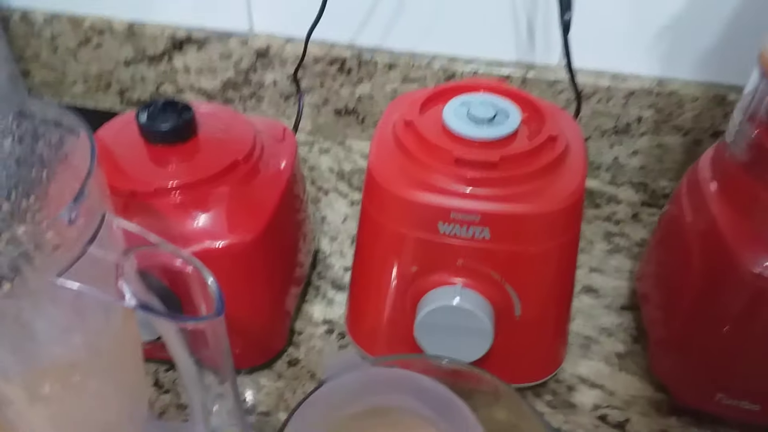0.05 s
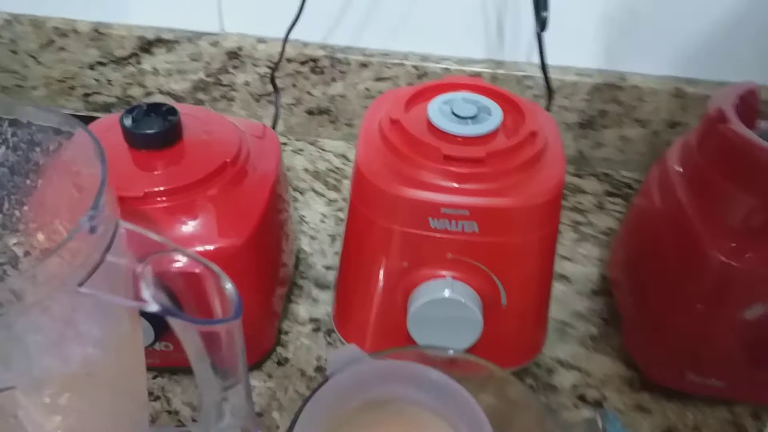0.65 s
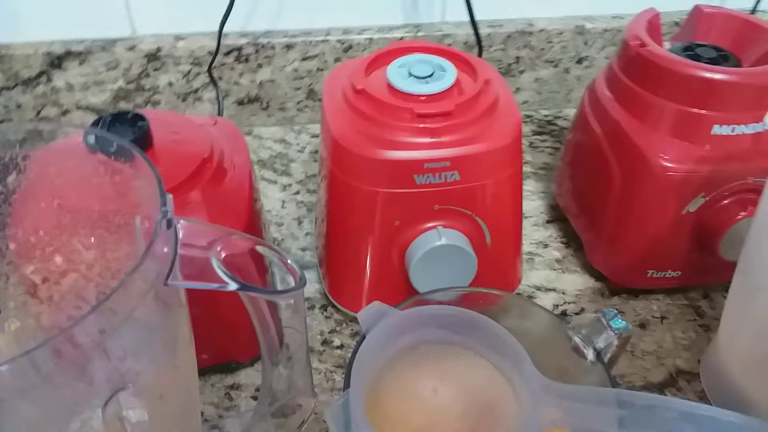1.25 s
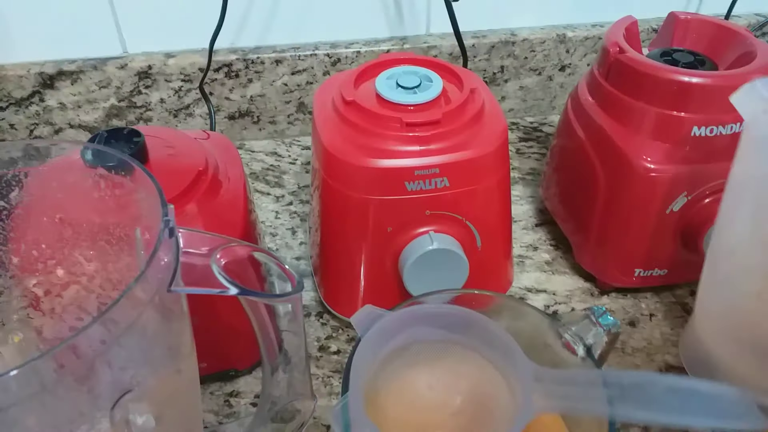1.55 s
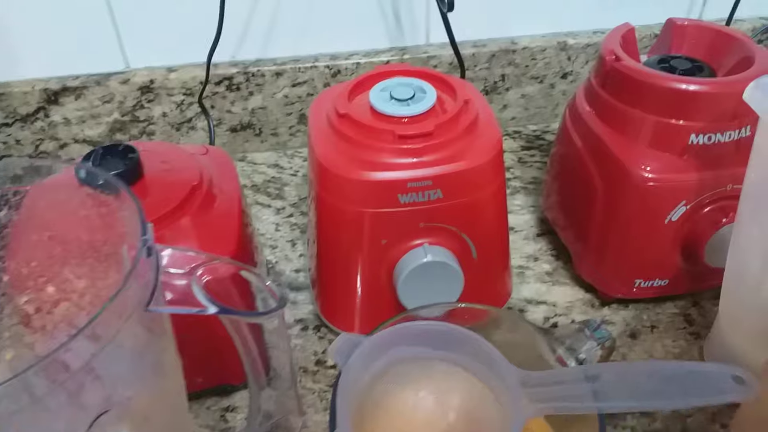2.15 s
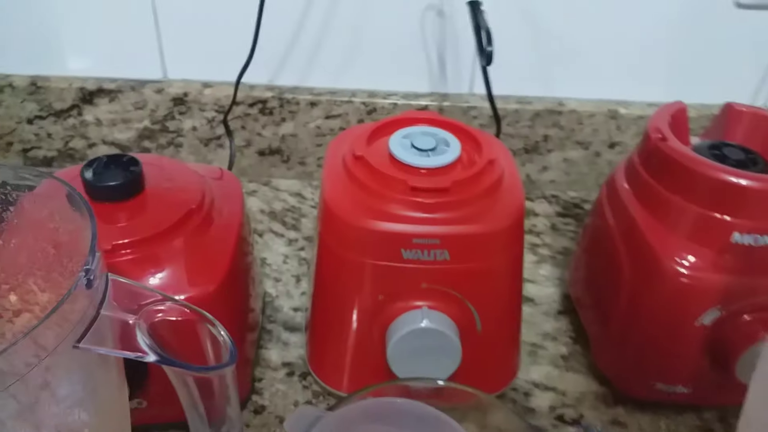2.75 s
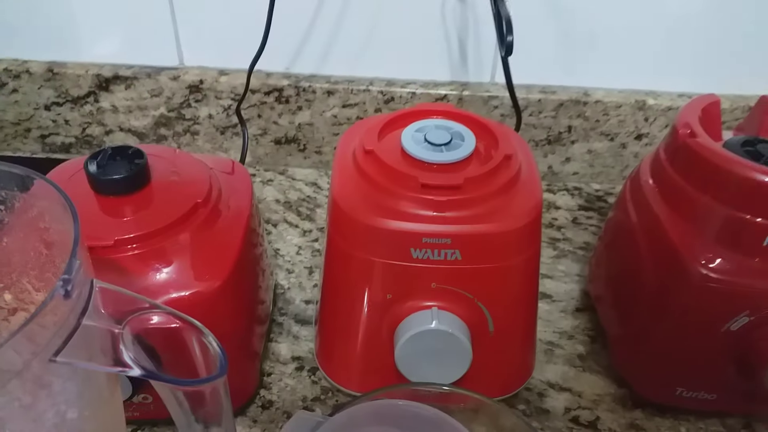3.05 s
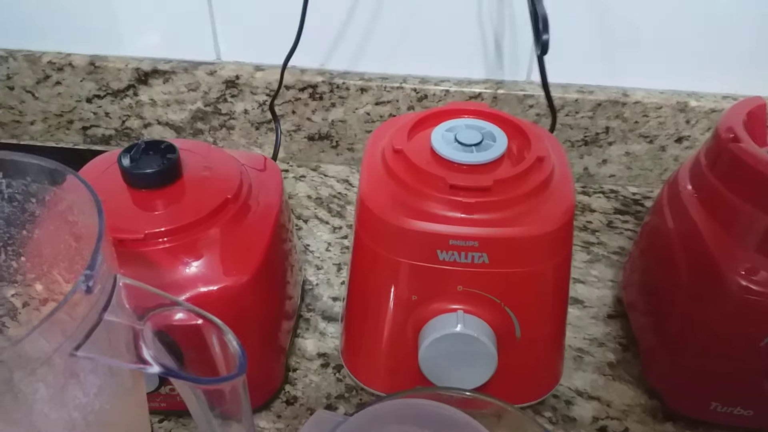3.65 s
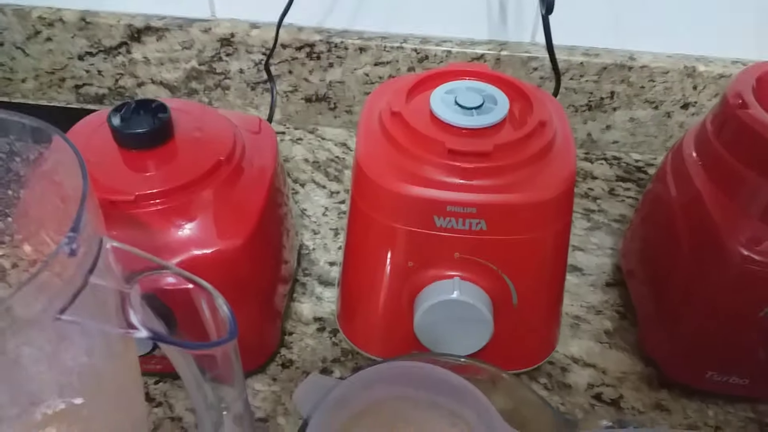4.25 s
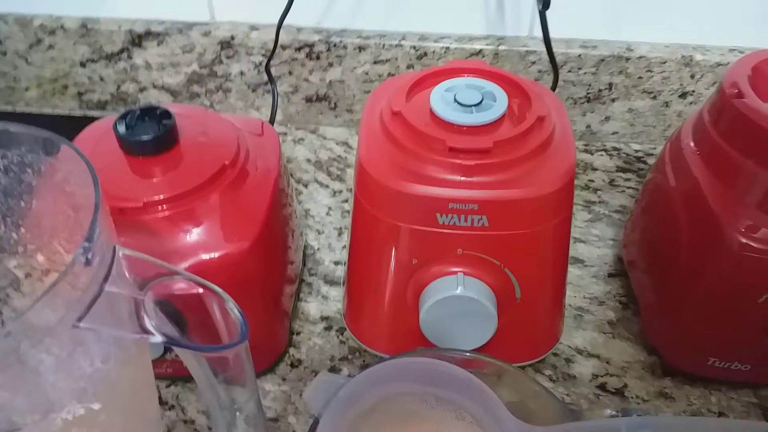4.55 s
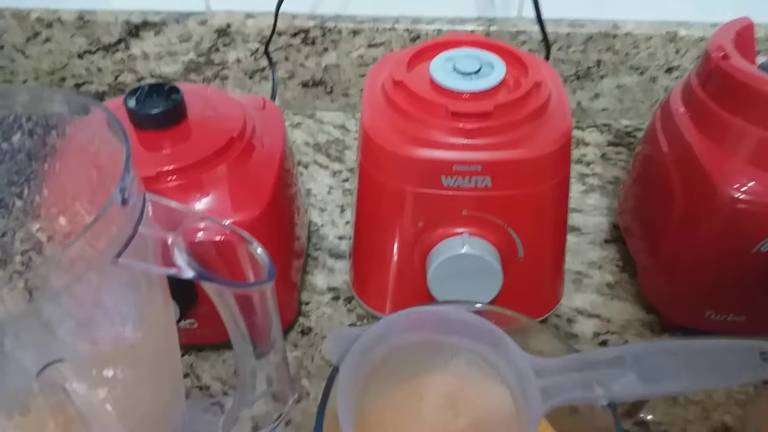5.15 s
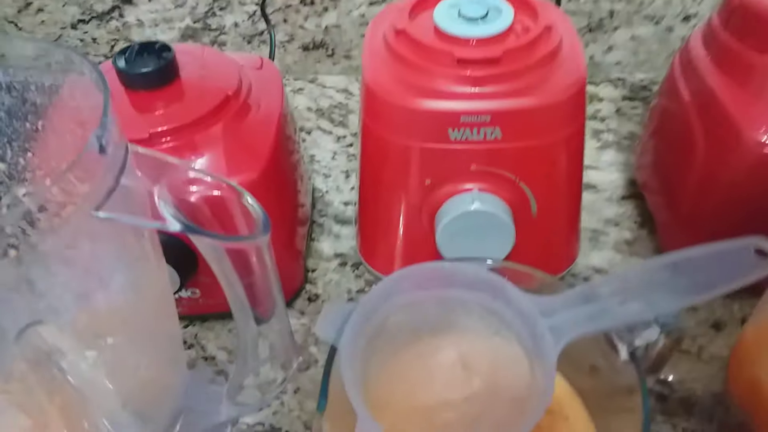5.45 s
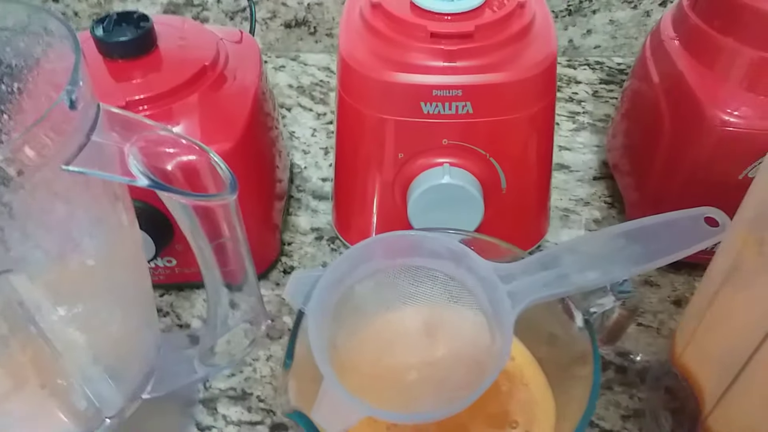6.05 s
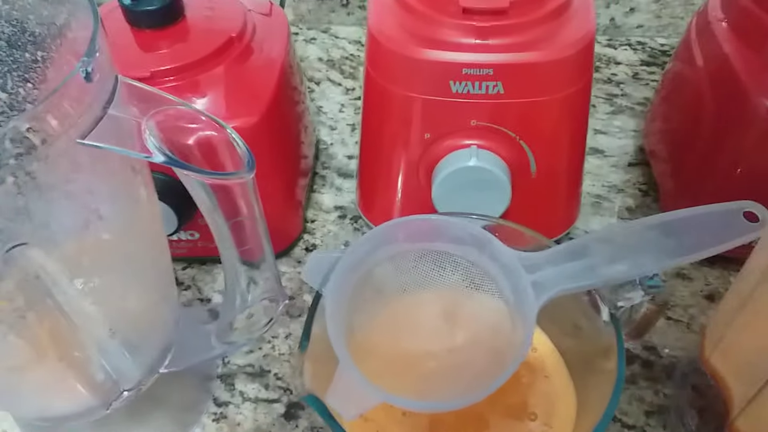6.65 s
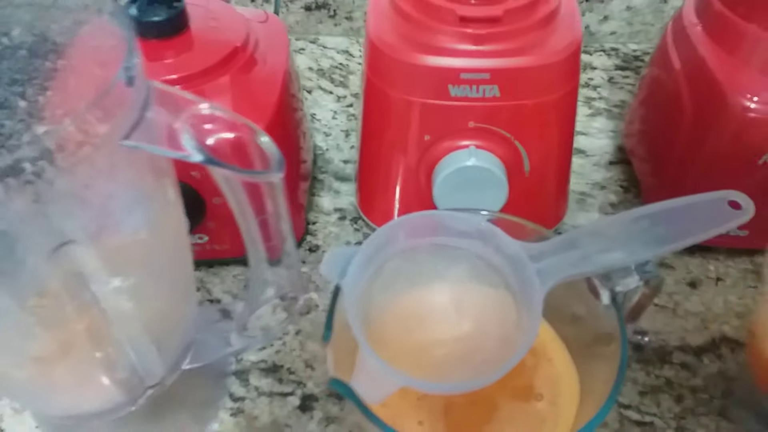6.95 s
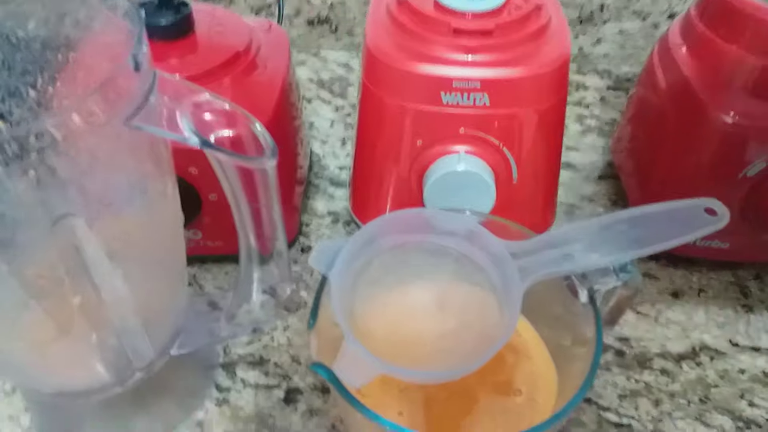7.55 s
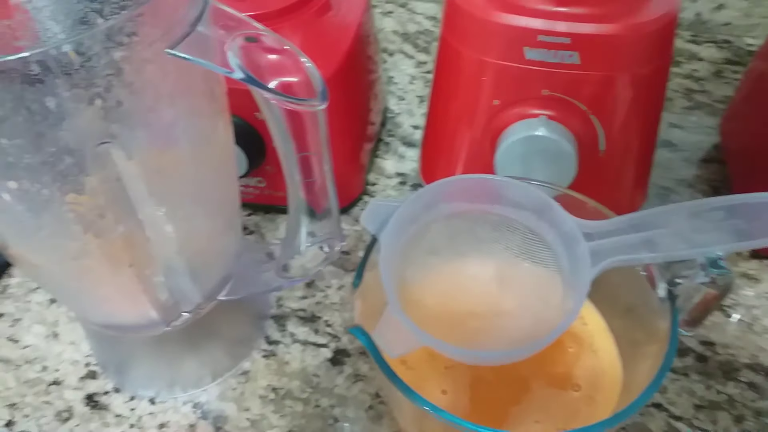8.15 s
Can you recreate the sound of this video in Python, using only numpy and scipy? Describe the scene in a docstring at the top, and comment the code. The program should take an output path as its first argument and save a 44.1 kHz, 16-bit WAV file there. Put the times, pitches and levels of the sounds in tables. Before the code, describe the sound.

Hollow plastic blender jugs are bumped, scraped and set down on stone, with two loud clatters and faint background hiss.

```python
"""Blender jugs on a stone counter.

Plastic jugs are lifted, bumped and set down in a small tiled kitchen. Each contact is a sharp click
plus the ring of the part hit; a jug set down bounces. Between blows, plastic slides and rubs.
Behind: a hush, swells of hiss, faint arching whistles. Gain control ducks after the hardest blows."""
import sys
import numpy as np
from scipy import signal
from scipy.fft import rfft, irfft
from scipy.io import wavfile
from scipy.ndimage import uniform_filter1d, minimum_filter1d

SR = 44100
rng = np.random.default_rng(int(sys.argv[2]) if len(sys.argv) > 2 else 0)


def materialize(psi):
    """Save the field psi as 16-bit PCM at rate SR to the path in sys.argv[1].

    A 1-D psi becomes a single channel; in a 2-D psi each row is a channel.
    """
    bounded = np.clip(np.atleast_2d(psi).T, -1, 1)
    quanta = np.round(bounded * 32767).astype(np.int16)
    wavfile.write(sys.argv[1], SR, quanta)


N = 370881
TIME_S = np.arange(N) / SR

# spectra of hush and hiss (frequency [Hz], relative density [dB])
HUSH_SPECTRUM = [(18, -54), (30, -15), (48, -9), (108, 4.5), (145, -5), (234, -3.5), (345, 1), (433, -5.5),
                 (485, -2), (1660, -11.5), (4050, -13), (5090, -14), (7000, -29), (9000, -26.5),
                 (16000, -20)]
HISS_SPECTRUM = [(2000, -26.5), (4200, -13.5), (5000, 1.5), (6000, -3.5), (7200, 5), (9000, -1.5),
                 (16000, -0.5)]
# hush envelope (time [s], level [dB])
HUSH_LEVEL = [(0, -49.5), (.45, -55), (2.6, -51), (3.7, -51.5), (4.3, -55), (6.9, -51.5), (7.55, -58),
              (7.97, -51.5), (8.41, -53)]
# swells of whistle and hiss (start [s], end [s], top pitch [Hz], whistle [dB], hiss [dB])
SWELLS = [(-.5, 0.545, 9000, -60, -44), (1.13, 1.896, 7900, -70, -57.5), (1.9, 3.1, 10000, -74, -48.5),
          (3.39, 4.099, 7100, -60.5, -63), (4.29, 4.911, 8400, -58.5, -54), (4.92, 5.55, 9000, -66, -53),
          (5.59, 6.324, 7400, -63, -58.5), (6.4, 7.206, 10000, -61, -46), (7.62, 8.32, 7900, -67.5, -60.5)]
# sliding strokes (start [s], end [s], scratch [dB], drone [dB])
SLIDES = [(0, 0.194, -56, -61), (1.975, 2.1, -36.5, -37), (2.09, 2.404, -54, -51.5),
          (2.453, 2.604, -45.5, -45), (2.6, 3.07, -52.5, -44.5), (3.14, 3.302, -37.5, -45),
          (3.85, 3.898, -53, -52.5), (4.85, 5.04, -51, -48.5), (5.183, 5.41, -60.5, -52.5),
          (6.607, 6.81, -50.5, -49), (6.843, 6.928, -35.5, -46.5)]
# resonances of a rubbed jug (centre [Hz], width [Hz], level [dB])
DRONE_BANDS = [(390, 200, 4), (1010, 99, 3), (1580, 160, -6.5), (2830, 83, -20)]
# blows, by part hit (time [s], ring [dB], pitch [ratio], click [dB])
BASE_BUMPS = [(.103, -31, 0.61, -36), (.1645, -23.5, 1.01, -22), (.197, -23, 1.58, -19),
              (1.621, -20, 1.12, -15), (1.8405, -9.5, .99, -10), (1.8935, -19.5, 1.2, -32),
              (2.051, -18.5, 1.25, -28), (2.080, -18.5, 0.97, -18.5), (2.1005, -12, 0.93, -15),
              (2.119, -23, 1.3, -17), (2.886, -28.5, 1, -39), (4.93, -32, 1.22, -40),
              (5.55, -37, 0.87, -33), (6.269, -18.5, 1.48, -11.5), (6.692, -28.5, 1.22, -29)]
HOLLOW_KNOCKS = [(1.364, -22, 0.92, -11.5), (1.391, -16.5, 0.97, -34), (1.4665, -13.5, 1.025, -19),
                 (2.568, -9, .99, -13.5), (2.582, -8.5, 1.035, -10.5), (2.7185, -30.5, 0.96, -17),
                 (2.7595, -20, 0.97, -16.5), (2.829, -22.5, .84, -16.5), (3.026, -31.5, 0.96, -62),
                 (4.292, -28, 0.88, -53)]
WALL_CLACKS = [(1.8415, -20.5, 0.86, -14), (3.1445, -20, 0.99, -8.5), (3.198, -31, 0.91, -42),
               (3.254, -27.5, 0.99, -29), (6.317, -17, 0.92, -6)]
FOOT_LANDING = [(3.9365, 3, 0.99, -0.5), (3.963, 0.5, 0.99, 6.5), (3.9995, 0, 0.98, 1)]
RIM_CLATTER = [(6.4145, -4, 0.98, 7), (6.4286, -3.5, 1, -5.5), (6.908, -39.5, 1, -33)]
# modes of each part (frequency [Hz], level [dB], T60 [s])
BASE_MODES = [(111.5, -14.5, .39), (209.3, -12, .42), (245, -11, .19), (291.8, -.5, .09), (325.8, -7, .12),
              (384, -2, .1), (481, -10, .18), (559, -7, .16), (813, -11, .1), (895, -13, .06),
              (1550, -21, .06)]
HOLLOW_MODES = [(116, -19.5, 0.27), (174.4, -18.5, 0.21), (308, -16, 0.059), (370.6, 2, 0.028),
                (475.7, -1.5, 0.31), (504, -16, 0.23), (507, -13.5, 0.11), (694, -29, 0.34),
                (899, -21.5, 0.27)]
WALL_MODES = [(113, -23.5, .17), (352, -17.5, .18), (486, -9, .2), (604, -11.5, .16), (803, -14, .4),
              (870, -1, .3), (961, -1, .3), (1025, -12.5, .4), (1850, -19, .18)]
FOOT_MODES = [(205, -17, .33), (345, -12, .27), (427, -5, .3), (459, -2, .33), (478, -8, .3),
              (560, -11, .25), (770, -11, .26), (860, -16, .2), (1017, -17, .18), (1284, -22, .22),
              (2122, -20, .2), (2220, -20, .2), (3068, -29, .15), (4250, -25, .1), (4550, -26, .1)]
RIM_MODES = [(340, -21.5, 0.41), (486, -16.5, 0.51), (538, -7, 0.23), (563, -3, 0.14), (1520, -15.5, 0.41),
             (1590, -14.5, 0.21), (2700, -22, 0.13), (2760, -6.5, 0.17), (3690, -11, 0.1),
             (3730, -6.5, .15), (4100, -10, .18), (4780, -19, .22), (5800, -20, .15)]
# light contacts (time [s], click [dB], brightness [Hz])
TICKS = [(1.402, -20, 6030), (1.4445, -22.5, 6000), (1.496, -21.5, 6000), (1.9875, -16, 9350),
         (4.482, -30.5, 3000), (4.709, -29, 14000), (5.1845, -14.5, 3550), (5.212, -22.5, 4000),
         (5.321, -36, 16100), (5.354, -31, 15800)]
# room decay (frequency [Hz], T60 [s])
KITCHEN_T60 = [(100, 0.58), (500, 0.33), (2000, 0.32), (5000, .32), (16000, 0.24)]


def from_db(db):
    """Decibels to gain."""
    return 10 ** (np.asarray(db) / 20)


def unit_rms(x):
    """Scale to rms 1."""
    return x / np.sqrt(np.mean(x ** 2) + 1e-20)


def at_hz(points, hz):
    """Interpolate a table over log frequency."""
    known_hz, values = np.transpose(points)
    return np.interp(np.log(np.maximum(hz, 1)), np.log(known_hz), values)


def butter(x, hz, kind, order=2):
    """Butterworth filter."""
    sos = signal.butter(order, np.clip(hz, 10, .45 * SR), kind, fs=SR, output="sos")
    return signal.sosfilt(sos, x)


def add(track, at_s, sound):
    """Mix a sound into a track."""
    start = max(round(at_s * SR), 0)
    track[start:start + len(sound)] += sound[:N - start]


def coloured_noise(spectrum):
    """Steady shaped noise, rms 1."""
    gain = from_db(at_hz(spectrum, np.fft.rfftfreq(N, 1 / SR)))
    return unit_rms(irfft(rfft(rng.standard_normal(N)) * gain, N))


def slow_noise(hz):
    """Low-passed noise, rms 1."""
    return unit_rms(butter(rng.standard_normal(N), hz, "low"))


def arch(start_s, end_s):
    """Parabola: 0 to 1 to 0."""
    along = np.clip((TIME_S - start_s) / (end_s - start_s), 0, 1)
    return 4 * along * (1 - along)


def kitchen(x, build_s=.0016):
    """Dense reflections off tiles: fast build-up, one decay rate per octave."""
    t = TIME_S[:SR * 3 // 5]
    noise, hz = rfft(rng.standard_normal(len(t))), np.fft.rfftfreq(len(t), 1 / SR)
    edges_hz = np.geomspace(45, 23040, 10)
    tail = np.zeros(len(t))
    for low, high in zip(edges_hz, edges_hz[1:]):
        band = irfft(noise * (hz >= low) * (hz < high), len(t))
        tail += band * from_db(-60 * t / at_hz(KITCHEN_T60, np.sqrt(low * high)))
    tail *= 1 - np.exp(-t / build_s)
    return signal.fftconvolve(x, tail / np.linalg.norm(tail))[:N]


def hush():
    """Room noise, drifting slowly in level."""
    return from_db(np.interp(TIME_S, *np.transpose(HUSH_LEVEL))) * coloured_noise(HUSH_SPECTRUM)


def hiss(rest_db=-63, full_at=.93, power=3.2):
    """Treble noise that grows with each swell, levels off and sinks."""
    swells = sum(from_db(db) * np.minimum(arch(start_s, end_s) / full_at, 1) ** power
                 for start_s, end_s, *_, db in SWELLS)
    return (from_db(rest_db) + swells) * coloured_noise(HISS_SPECTRUM)


def whistles(foot_hz=4700, width_hz=50, lower_ratio=.87, waver=.014, waver_hz=10, breakup_db=2.5):
    """Two thin whistles and their octaves arch with each swell, wavering and breaking up."""
    out, rise_hz, level, height = np.zeros((4, N))
    for start_s, end_s, top_hz, db, _ in SWELLS:
        swell = arch(start_s, end_s)
        rise_hz += (top_hz - foot_hz) * swell
        level += from_db(db) * swell ** .2
        height += swell
    pitch_hz = (foot_hz + rise_hz) * (1 + waver * height * slow_noise(waver_hz))
    for ratio, gain in ((1, 1), (lower_ratio, from_db(-3) * height)):
        phase = 2 * np.pi * np.cumsum(ratio * pitch_hz) / SR
        fundamental = slow_noise(width_hz) * np.sin(phase)
        octave = from_db(3) * height * slow_noise(width_hz) * np.sin(2 * phase)
        out += gain * from_db(breakup_db * slow_noise(waver_hz)) * (fundamental + octave)
    return level * out


def slides(slips_per_s=3500, spread_db=4, squeak_hz=(3900, 5600), body_db=-6, room_db=-6):
    """Stick-slip of plastic on stone: a stream of tiny clicks that also sets the hollow jug droning."""
    scratch_level, drone_level = np.zeros((2, N))
    for start_s, end_s, scratch_db, drone_db in SLIDES:
        stroke = signal.windows.tukey(max(round((end_s - start_s) * SR), 2), .5)
        add(scratch_level, start_s, from_db(scratch_db) * stroke)
        add(drone_level, start_s, from_db(drone_db) * stroke)
    slips = (rng.random(N) < slips_per_s / SR) * rng.choice([-1, 1], N)
    slips = slips * from_db(spread_db * np.minimum(rng.exponential(1, N), 4))
    scratch = butter(slips, squeak_hz, "band", order=1) + from_db(body_db) * butter(slips, 600, "high")
    drone = sum(from_db(db) * butter(slips, (hz - width / 2, hz + width / 2), "band", order=1)
                for hz, width, db in DRONE_BANDS)
    rub = scratch_level * unit_rms(scratch) + drone_level * unit_rms(drone)
    return rub + from_db(room_db) * kitchen(rub)


def rings(blows, modes, clunk_hz, clunk_db, clunk_t60_s, rise_s, early_db, early_s, tone_room_db):
    """Each blow rings every mode at random strength, over a clunk of crowded, well-damped modes."""
    tones, clunks = np.zeros((2, N))
    t = TIME_S[:SR // 2]
    hz, mode_db, t60_s = np.transpose(modes)[:, :, None]
    # largest while the parts still touch
    swing = (1 - np.exp(-t / rise_s)) * (1 + from_db(early_db) * np.exp(-t / early_s)) / 2
    scatter_db = 3.5 * rng.standard_normal((len(blows), len(modes), 1))
    for (at_s, ring_db, pitch, *_), offset_db in zip(blows, scatter_db):
        partials = np.sin(2 * np.pi * pitch * hz * t) * from_db(mode_db + offset_db - 60 * t / t60_s)
        add(tones, at_s, from_db(ring_db) * swing * partials.sum(axis=0))
        crowd = unit_rms(butter(rng.standard_normal(len(t)), pitch * np.array(clunk_hz), "band"))
        add(clunks, at_s, crowd * from_db(ring_db + clunk_db - 60 * t / clunk_t60_s))
    sound = tones + clunks + kitchen(from_db(tone_room_db) * tones + clunks)
    return butter(sound, 81, "high", order=3)   # small bodies radiate no deep bass


def clicks(contacts, t60_s, low_hz, room_db):
    """Upper modes of the plastic, gone in milliseconds; hard contacts are brighter and thinner."""
    out, t = np.zeros(N), TIME_S[:SR // 10]
    for at_s, *_, click_db, bright_hz in contacts:
        burst = rng.standard_normal(len(t)) * from_db(click_db - 60 * t / t60_s)
        add(out, at_s, butter(burst, (bright_hz ** 2 / 90000, bright_hz), "band", order=1))
    out = butter(out + 1e-18, low_hz, "high", order=1)
    out = butter(out, 90, "high")
    return out + from_db(room_db) * kitchen(out)


def hardness(blows, ref_hz, db_per_octave=25):
    """Blows to click contacts: the further click stands above ring, the harder and brighter."""
    return [(at_s, click_db, min(ref_hz * 2 ** ((click_db - ring_db) / db_per_octave), SR / 3))
            for at_s, ring_db, _, click_db in blows]


def bounces(blows, hits, gap_s, ring_loss_db, click_loss_db, shrink=.9):
    """A jug rebounds after each blow, each time sooner and weaker."""
    return [(at_s + gap_s * sum(shrink ** j for j in range(k)),
             ring_db - k * ring_loss_db, pitch, click_db - k * click_loss_db)
            for at_s, ring_db, pitch, click_db in blows for k in range(hits)]


def bumps():
    """Dull bumps against motor bases and counter."""
    ring = rings(BASE_BUMPS, BASE_MODES, clunk_hz=(200, 850), clunk_db=-7, clunk_t60_s=.034,
                 rise_s=.002, early_db=2, early_s=.0068, tone_room_db=-11.5)
    return ring + clicks(hardness(BASE_BUMPS, ref_hz=2420), t60_s=.029, low_hz=300, room_db=-4.5)


def knocks():
    """Knocks on the hollow jug in the hand."""
    ring = rings(HOLLOW_KNOCKS, HOLLOW_MODES, clunk_hz=(280, 560), clunk_db=-11.5, clunk_t60_s=.11,
                 rise_s=.0033, early_db=6.5, early_s=.0114, tone_room_db=-13.5)
    return ring + clicks(hardness(HOLLOW_KNOCKS, ref_hz=3200), t60_s=.03, low_hz=634, room_db=-8)


def ticks():
    """Rims and strainer touch lightly: click only."""
    return clicks(TICKS, t60_s=.02, low_hz=690, room_db=-4)


def clacks():
    """Clacks on the stiff jug wall."""
    ring = rings(WALL_CLACKS, WALL_MODES, clunk_hz=(780, 1080), clunk_db=-4, clunk_t60_s=.087,
                 rise_s=.00074, early_db=8.5, early_s=.012, tone_room_db=-10.5)
    return ring + clicks(hardness(WALL_CLACKS, ref_hz=4800), t60_s=.021, low_hz=900, room_db=-4)


def landing():
    """The full jug lands and rocks on its foot."""
    blows = bounces(FOOT_LANDING, hits=3, gap_s=.0088, ring_loss_db=2, click_loss_db=3)
    ring = rings(blows, FOOT_MODES, clunk_hz=(380, 950), clunk_db=-8, clunk_t60_s=.047,
                 rise_s=.0028, early_db=6, early_s=.01, tone_room_db=-17.5)
    click = clicks(hardness(blows, ref_hz=3200), t60_s=.036, low_hz=500, room_db=-5)
    return butter(ring + butter(click, 6000, "low"), 180, "high")


def clatter():
    """The second jug clatters onto the stone, later settles."""
    blows = bounces(RIM_CLATTER, hits=2, gap_s=.0075, ring_loss_db=9, click_loss_db=15.5)
    ring = rings(blows, RIM_MODES, clunk_hz=(430, 680), clunk_db=-14.5, clunk_t60_s=.05,
                 rise_s=.0015, early_db=8, early_s=.003, tone_room_db=-14.5)
    click = clicks(hardness(blows, ref_hz=5200), t60_s=.018, low_hz=1200, room_db=3.5)
    return ring + butter(click, 10500, "low")


def gain_control(x, depth_db=9, hold_s=.95, release_db_per_s=18):
    """A peak over full scale cuts the gain at once; it holds, then creeps back."""
    over_db = np.clip(20 * np.log10(np.abs(x[0]) + 1e-9), 0, depth_db)
    half_hold = int(hold_s * SR / 2)
    held_db = -minimum_filter1d(-over_db, 2 * half_hold + 1, origin=half_hold, mode="constant")
    ramp_db = release_db_per_s * TIME_S
    duck_db = np.maximum.accumulate(held_db + ramp_db) - ramp_db
    return x * from_db(-uniform_filter1d(duck_db, size=64))


def scene():
    """All sources, mono."""
    jugs = bumps() + knocks() + clacks() + landing() + clatter() + ticks()
    return (jugs + slides() + hush() + hiss() + whistles())[None]


def record(dry):
    """Microphone with steep treble roll-off and weak top shelf; gain control, soft clip, band limits."""
    shelf = from_db(-10.5) * butter(dry, 11000, "high", order=3)
    ducked = gain_control(butter(dry, 6850, "low", order=10) + shelf)
    rounded = ducked / (1 + ducked ** 4) ** .25
    lowpass = signal.ellip(10, .1, 80, 16000, fs=SR, output="sos")
    return signal.sosfilt(lowpass, butter(rounded, 35, "high"))


dry = scene()
out = record(dry)
materialize(out)
```